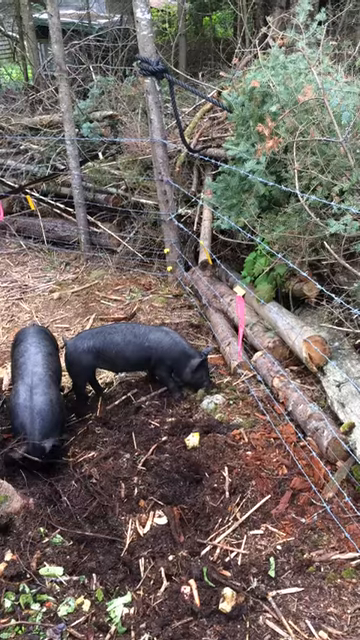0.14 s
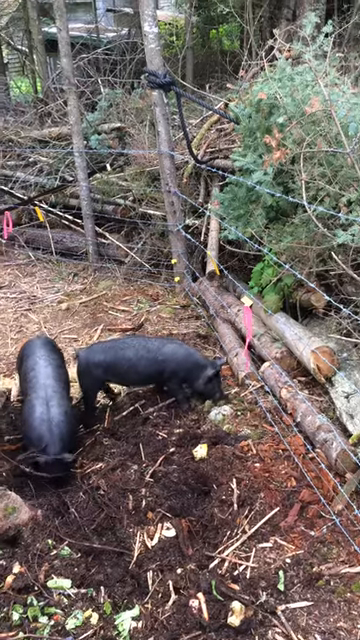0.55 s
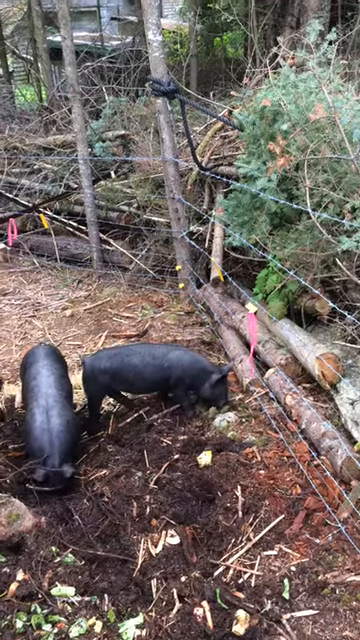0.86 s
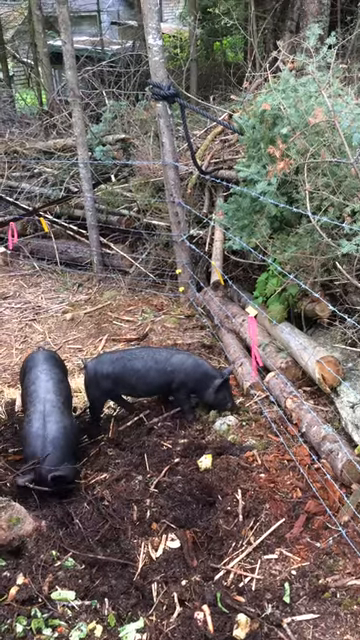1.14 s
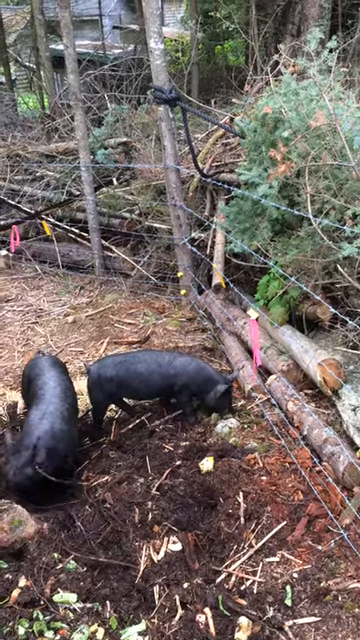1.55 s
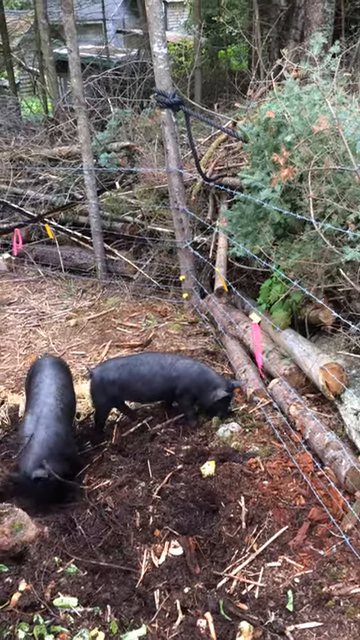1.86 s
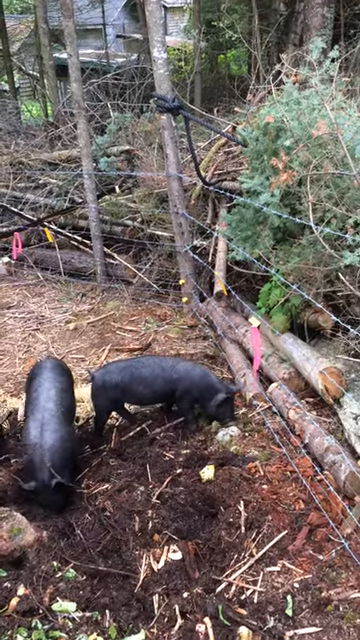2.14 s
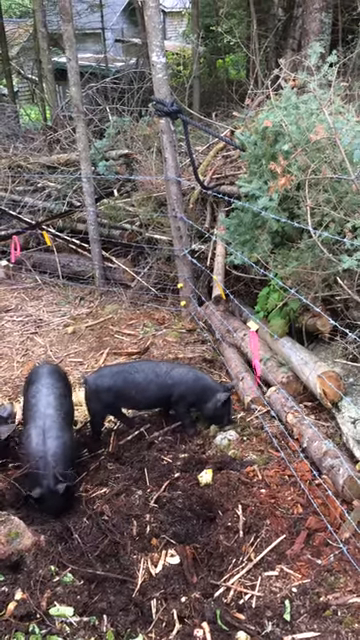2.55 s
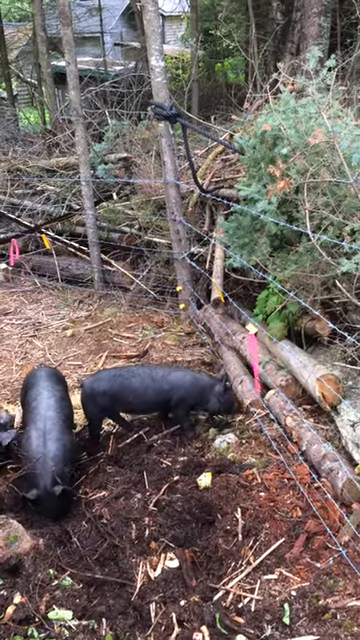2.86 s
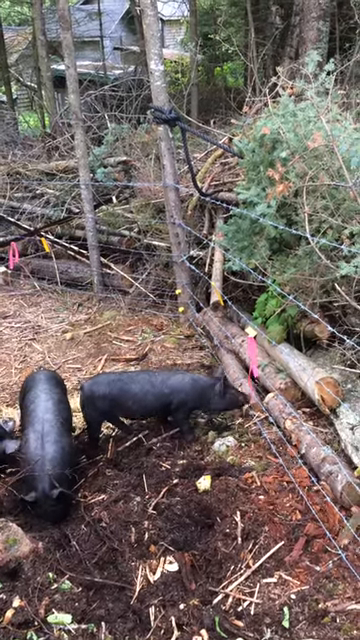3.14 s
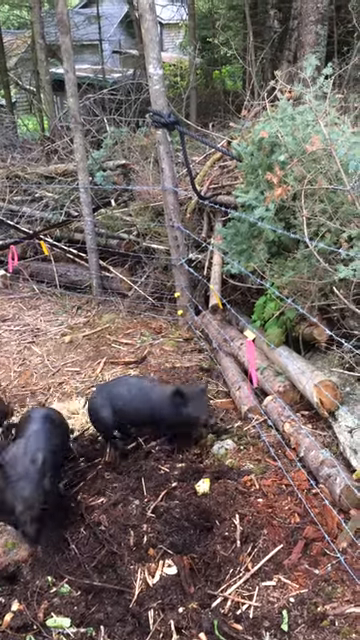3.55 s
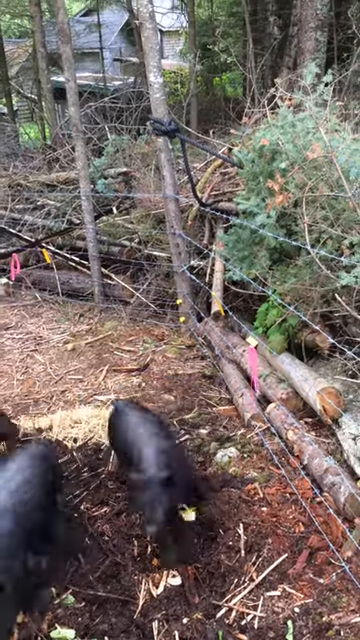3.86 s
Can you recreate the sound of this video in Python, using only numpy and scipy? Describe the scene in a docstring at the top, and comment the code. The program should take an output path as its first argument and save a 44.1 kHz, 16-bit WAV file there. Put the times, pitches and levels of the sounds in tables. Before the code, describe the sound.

A pig's single harsh squeal, high, rough and breathy, bursts out at about 3.4 seconds and falls slightly in pitch until 3.7, with a faint answer from the trees. Before it, the outdoor pen is quiet: distant low hum, faint leaf rustle, a very soft short grunt near 2.0 and barely audible ticks. Light hoof thuds and dry twig snaps follow until 4.0. Close phone sound, identical in both channels.

```python
"""Squeal in a wooded pig pen

A phone microphone hears a distant hum and leaf rustle, one soft grunt, twig ticks and hoof thuds.
Then a pig squeals: two oscillators in its throat, a whistle and a slower flutter, combine into a ladder
of rough lines over breathy noise; trees and a far wall answer faintly. Pulses through chest resonances make
the grunt, damped sines with noise bursts the ticks and thuds, and shaped noise the hum and rustle."""
import sys
import numpy as np
from scipy import signal
from scipy.fft import rfft, irfft, next_fast_len
from scipy.io import wavfile
from scipy.ndimage import uniform_filter1d, minimum_filter1d, map_coordinates

SR = 44100
rng = np.random.default_rng(int(sys.argv[2]) if len(sys.argv) > 2 else 0)


def unload_wav(signal):
    """Save mono or channel-first audio to the path in sys.argv[1] as 16-bit WAV at rate SR, clipped to [-1, 1]."""
    wavfile.write(
        sys.argv[1],
        SR,
        np.round(np.clip(np.atleast_2d(signal).T, -1, 1) * 32767).astype(np.int16),
    )


N = 176400  # samples


def amp(db):
    """Level: decibels to an amplitude ratio."""
    return 10 ** (np.asarray(db) / 20)


def unit(x):
    """Normalization: scale to an rms of 1."""
    return x / np.sqrt(np.mean(np.abs(x) ** 2) + 1e-20)


def along(points, hz):
    """Logarithmic frequency scale: interpolate (f/Hz, value) points along it."""
    f, value = np.transpose(points)
    return np.interp(np.log(hz + 1), np.log(f + 1), value)


def curves(rows):
    """Linear interpolation: one value per sample for each column after the time."""
    times, *columns = np.transpose(rows)
    return [np.interp(np.arange(N) / SR, times, column) for column in columns]


def wobble(rate):
    """Random fluctuation: a smooth curve through normal draws, rate knots a second."""
    return map_coordinates(rng.standard_normal(N // 20), [np.arange(N) * rate / SR])


def filtered(x, response):
    """Linear filtering: multiply the spectrum by a response of frequency."""
    m = next_fast_len(N + SR // 2)
    return irfft(rfft(x, m) * response(np.fft.rfftfreq(m, 1 / SR)), m)[..., :N]


def resonance(f, hz, wide_hz):
    """Simple resonance: the response of one damped oscillator, 1 at its peak."""
    return 1j * f * wide_hz / (hz * hz - f * f + 1j * f * wide_hz)


def rush(spectrum, patchy_db):
    """Shaped noise: a spectral envelope over noise with patches of random gain, at rms 1."""
    z = signal.stft(rng.standard_normal(N), nperseg=512)[2]
    field = uniform_filter1d(rng.standard_normal(z.shape), size=6, axis=0)  # smooth in frequency
    field = uniform_filter1d(field, size=8, axis=1)  # smooth in time
    patchy = signal.istft(z * amp(patchy_db * unit(field)), nperseg=512)[1][:N]
    return unit(filtered(patchy, lambda hz: amp(along(spectrum, hz))))


ROUGH, ROUGH_RATE = .3, 200  # share of random shaking (0-1), its knots per second


def rough_line(phase, rough=ROUGH, faster=1):
    """Random modulation: shaking a line's amplitude and phase widens it; rms 1."""
    random_part = wobble(faster * ROUGH_RATE) + 1j * wobble(faster * ROUGH_RATE)
    shake = 1 - rough + rough * random_part
    return unit((shake * np.exp(1j * phase)).real)


# Course of the squeal: t/s, whistle f/Hz, line over it f/Hz, line under it f/Hz, then level/dB of: line under,
# whistle, line over, throat rasp, line over the doubled whistle, treble
SQUEAL_COURSE = [(3.412, 2832, 3308, 1900, -14, -29, -33, -26, -22.5, -25),
                 (3.43, 2839, 3340, 1959, -13, -17.5, -15, -15, -34, -21.5),
                 (3.445, 2720, 3390, 1951, -20, -15, -7, -20, -31.5, -17),
                 (3.47, 2740, 3476, 2040, -26.5, -11.5, -8.5, -24, -21, -21),
                 (3.49, 2722, 3428, 2005, -26.5, -18.5, -10, -31, -32.5, -22),
                 (3.51, 2741, 3437, 2076, -25, -15, -15, -27, -24.5, -25),
                 (3.53, 2730, 3415, 2037, -22.5, -14, -13, -30, -25, -20),
                 (3.552, 2754, 3400, 2100, -35, -18, -18.5, -28, -21.5, -24),
                 (3.566, 2621, 3270, 1968, -29, -22.5, -17.5, -38, -19, -26),
                 (3.59, 2616, 3276, 1996, -33, -26, -23.5, -39.5, -23.5, -25.5),
                 (3.61, 2587, 3214, 1967, -25, -44, -20.5, -41.5, -51, -25),
                 (3.632, 2585, 3160, 1987, -35.5, -34, -18, -43.5, -48, -27.5),
                 (3.655, 2492, 3135, 1792, -31, -33.5, -27.5, -43.5, -61, -26.5),
                 (3.675, 2550, 3085, 1645, -38, -46, -27, -49, -58, -29),
                 (3.695, 2280, 2990, 1660, -46, -33, -42, -46, -64, -34.5)]
# Weaker combination lines: multiple of whistle, multiple of flutter, level/dB relative to the treble
COMBINATION_LINES = [(2, -1, -16), (2, 0, -13), (2, 2, -18), (2, 3, -11), (3, 0, -10), (3, 1, -9),
                     (3, 2, -9), (3, 3, -9), (3, 4, -8), (4, 0, -9), (4, 1, -11), (4, 2, -16), (1, 2, -14)]
# Lines at half-flutter steps from the whistle: offset in flutters (rounded to the nearest half, so one falls on
# the whistle itself), level/dB relative to the strong lines
SIDE_LINES = [(1.5, -14.5), (0.25, -19), (-0.75, -28.5)]
# Plain lower note on which the voice first catches: multiple of its fundamental, level/dB
CATCH_NOTE = [(1, -44), (3, -9.5), (4, -15.5), (5, -20), (8, -20)]
# Spectrum of the breath noise: f/Hz, relative level/dB
BREATH_SPECTRUM = [(290, -71.5), (500, -51.5), (1030, -20.5), (1590, -13.5), (2000, 7), (2450, -22.5),
                   (2680, -7), (2880, -7.5), (3370, 5), (4250, -10.5), (5930, -11.5), (7050, -4.5),
                   (10900, -9.5), (15200, -20.5), (15800, -33)]
# Hollows of the mouth: f/Hz, width/Hz, depth (0-1)
MOUTH_HOLLOWS = [(4186, 170, .95), (6980, 270, 0.3), (12900, 500, .95)]
ATTACK_S, RELEASE_S = .0079, .012  # before the first row and after the last
DRIFT_RAD, DRIFT_RATE = .35, 90  # phase drift, its knots per second
LADDER_ROUGH, FADE_DB, FADE_RATE = .65, 5, 30  # shaking share; each line's fading, its knots per second
CATCH_HZ, CATCH_T60_S = 603.3, .091
FLUTTER_DB = -29.5  # the bare flutter, relative to the treble
RASP_HZ, RASP_SAG_HZ_PER_S2, RASP_ROUGH = 1099, 3000, .6
SIDE_LINES_END_S, SIDE_LINES_FADE_S = 3.56, .016
BREATH_LOW_DB, BREATH_HIGH_DB, SPLIT_HZ = -6, -1, 3600  # relative to strong lines; to treble; band edge


def squeal():
    """Nonlinear coupling: whistle and flutter form sum and difference lines, with rasp and breath."""
    (whistle, over, under, under_db, whistle_db, over_db,
     rasp_db, double_db, treble_db) = curves(SQUEAL_COURSE)
    start, end = SQUEAL_COURSE[0][0], SQUEAL_COURSE[-1][0]
    t = np.arange(N) / SR - start
    attack = np.clip(t / ATTACK_S + 1, 0, 1) ** 2
    release = np.clip((end - start - t) / RELEASE_S + 1, 0, 1) ** 2

    # Phase is the integral of frequency, plus a drift
    fast, slow, below = [2 * np.pi * np.cumsum(hz) / SR + DRIFT_RAD * wobble(DRIFT_RATE)
                         for hz in (whistle, over - whistle, under)]

    voice = amp(under_db) * rough_line(below)
    voice += amp(whistle_db) * rough_line(fast)
    voice += amp(over_db) * rough_line(fast + slow)
    voice += amp(double_db) * rough_line(2 * fast + slow)
    for m, k, db in COMBINATION_LINES:
        level = amp(treble_db + db + FADE_DB * wobble(FADE_RATE))
        voice += level * rough_line(m * fast + k * slow, LADDER_ROUGH, faster=m / 2)
    voice += amp(treble_db + FLUTTER_DB) * rough_line(slow)

    catch_decay = amp(-60 * np.abs(t) / CATCH_T60_S)
    for k, db in CATCH_NOTE:
        voice += catch_decay * amp(db) * rough_line(2 * np.pi * round(k) * CATCH_HZ * t)

    effort = np.sqrt(amp(under_db) ** 2 + amp(whistle_db) ** 2 + amp(over_db) ** 2)  # the strong lines
    fading = np.clip((SIDE_LINES_END_S - start - t) / SIDE_LINES_FADE_S, 0, 1)
    for k, db in SIDE_LINES:
        voice += effort * fading * amp(db) * rough_line(fast + round(2 * k) / 2 * slow, LADDER_ROUGH)

    rasp_phase = 2 * np.pi * (RASP_HZ * t - RASP_SAG_HZ_PER_S2 * t ** 3 / 3)
    rasp = amp(rasp_db) * rough_line(rasp_phase, RASP_ROUGH)

    breath = rush(BREATH_SPECTRUM, patchy_db=2.5) * (1 + .5 * np.cos(slow))  # the flutter chops it
    low = amp(BREATH_LOW_DB) * effort * unit(filtered(breath, lambda f: f < SPLIT_HZ))
    high = amp(treble_db + BREATH_HIGH_DB) * unit(filtered(breath, lambda f: f >= SPLIT_HZ))

    sound = attack * release * (voice + rasp + low + high)
    return filtered(sound, lambda f: np.prod(
        [1 - depth * resonance(f, hz, wide) for hz, wide, depth in MOUTH_HOLLOWS], axis=0))


# Course of the grunt: t/s, mean pulse rate f/Hz, level/dB
GRUNT_COURSE = [(1.945, 155, -58), (1.96, 144, -49.5), (2.0, 86, -47), (2.035, 74, -43), (2.055, 99, -62)]
# Chest resonances, each applied twice: f/Hz, width/Hz of one pass, relative level/dB
CHEST_RESONANCES = [(167, 130, 4), (340, 140, -17)]


def grunt():
    """Source and filter: uneven throat pulses, slowing for most of the grunt, ring the chest."""
    rate, db = curves(GRUNT_COURSE)
    t = np.arange(N) / SR
    cycles = np.cumsum(rate * (1 + .15 * wobble(74))) / SR
    pulses = np.diff(np.floor(cycles), prepend=0)  # one pulse per whole cycle
    pulses = pulses * amp(2 * wobble(90))

    def chest(f):
        """Parallel resonances: neighbours add with opposite sign."""
        return sum((-1) ** k * amp(gain) * resonance(f, hz, wide) ** 2
                   for k, (hz, wide, gain) in enumerate(CHEST_RESONANCES))
    sounding = (t > GRUNT_COURSE[0][0]) * (t < GRUNT_COURSE[-1][0])
    return unit(filtered(pulses, chest)) * amp(db) * sounding


# Snapping twigs: t/s, initial level/dB, ring f/Hz
TWIG_TICKS = [(2.228, -43, 6200), (2.95, -52, 11000), (3.344, -39, 2960), (3.35, -36, 1000),
              (3.75, -33.5, 2220), (3.8, -50, 2600), (3.87, -39, 1400), (3.872, -43, 10520),
              (3.937, -42.5, 4430), (3.98, -26.5, 6780)]
# Hooves on soil: t/s, initial level/dB, ring f/Hz
HOOF_THUDS = [(1.28, -49, 62), (2.36, -48.5, 160), (3.348, -38.5, 654), (3.394, -36, 397), (3.53, -38, 60),
              (3.655, -45.5, 570), (3.70, -40, 837), (3.745, -42, 226), (3.836, -48.5, 176.7),
              (3.847, -46, 110), (3.93, -44, 108), (3.978, -43.5, 450)]


def knocks(events, t60, ring, noise_hz):
    """Impact: a damped sine (share ring) with low-passed noise, falling 60 dB in t60 seconds."""
    out, t = np.zeros(N + SR), np.arange(SR // 10) / SR
    lowpass = signal.butter(2, noise_hz, fs=SR, output="sos")
    for start, db, hz in events:
        noise = unit(signal.sosfilt(lowpass, rng.standard_normal(len(t))))
        body = ring * np.sin(2 * np.pi * hz * t) + (1 - ring) * noise
        out[round(start * SR):][:len(t)] += amp(db - 60 * t / t60) * body
    return out[:N]


# Reverberation of the trees: f/Hz, t60/s
TREE_DECAY = [(300, 0.32), (1900, .35), (3000, 0.52), (5000, 0.24), (10000, 0.27)]
TREES_DELAY_S = .03


def trees(x):
    """Diffuse reverberation: a noise tail in which each frequency decays at its own rate."""
    hz, t, z = signal.stft(rng.standard_normal(SR * 2 // 3), SR, nperseg=256)
    decay = amp(-60 * t / along(TREE_DECAY, hz)[:, None])
    tail = signal.istft(z * decay, SR, nperseg=256)[1]
    delayed = np.pad(x, (round(TREES_DELAY_S * SR), 0))
    return signal.fftconvolve(delayed, tail / np.linalg.norm(tail))[:N]


FAR_S, FAR_HZ, FAR_WIDE_HZ = .29, 2750, 500  # delay, centre and width of the reflected band


def far_wall(x):
    """Discrete echo: a late, band-limited reflection smeared by a short decaying noise."""
    t = np.arange(SR // 20) / SR
    smear = unit(rng.standard_normal(len(t)) * amp(-60 * t / .089)) / np.sqrt(len(t))
    smeared = signal.fftconvolve(x, smear)[:N]
    # A linear phase is a pure delay
    return filtered(smeared, lambda f: resonance(f, FAR_HZ, FAR_WIDE_HZ) * np.exp(-2j * np.pi * f * FAR_S))


# Course of the background before its offsets: t/s, hum level/dB, rustle level/dB
BACKGROUND_COURSE = [(.12, -61.5, -76), (.35, -62.5, -71.5), (.55, -62.5, -68), (1, -61, -73.5),
                     (1.35, -60, -68.5), (1.5, -63, -68.5), (1.61, -59, -66.5), (1.68, -59.5, -60.5),
                     (1.76, -59.5, -69), (2.05, -61.5, -67.5), (2.2, -59.5, -72), (2.9, -59, -71.5),
                     (3.12, -59, -70.5), (3.33, -60, -71), (3.35, -48.5, -58), (3.375, -54.5, -60),
                     (3.4, -53, -44), (3.7, -59, -51.5), (3.8, -65.5, -65.5), (3.91, -62, -65),
                     (3.94, -57.5, -61), (4, -59.5, -55.5)]
# Spectrum of the hum: f/Hz, relative level/dB
HUM_SPECTRUM = [(15, -37), (25, -8), (172, -2.5), (242, -8), (364, -5), (411, -9), (890, -9), (957, -6),
                (1710, -12.5), (1970, -14), (8000, -32.5), (10400, -81.5), (17600, -120)]
# Spectrum of the leaf rustle: f/Hz, relative level/dB
LEAF_SPECTRUM = [(1470, -29), (2500, -2.5), (5050, -5), (8940, -8.5), (11100, -8.5), (14700, -13),
                 (15800, -10.5)]
HUM_OFFSET_DB, RUSTLE_OFFSET_DB = 2.5, 1
BASS_LUMPS_DB, RUSTLE_WAVER_DB = 3.5, 1  # depths of random level change


def woods():
    """Stationary noise under slow modulation: a far hum with lumpy bass, and rustling leaves."""
    hum_db, rustle_db = curves(BACKGROUND_COURSE)
    hum = rush(HUM_SPECTRUM, patchy_db=1.5)
    bass = filtered(hum, lambda f: 1 / (1 + (f / 250) ** 4))
    hum = hum - bass + bass * amp(BASS_LUMPS_DB * wobble(25))
    rustle_level = amp(rustle_db + RUSTLE_OFFSET_DB + RUSTLE_WAVER_DB * wobble(22))
    return amp(hum_db + HUM_OFFSET_DB) * hum + rustle_level * rush(LEAF_SPECTRUM, patchy_db=0)


def scene():
    """Superposition: sources and reflections add at one microphone, copied to two channels."""
    pig = squeal()
    answers = amp(-27) * trees(pig) + amp(-45) * far_wall(pig)
    ticks = knocks(TWIG_TICKS, t60=.01, ring=.59, noise_hz=12000)
    thuds = knocks(HOOF_THUDS, t60=.09, ring=.59, noise_hz=600)
    mono = pig + answers + grunt() + ticks + thuds + woods()
    return np.array([mono, mono])


CEILING, LOOK_S = .98, .003  # limiter peak amplitude and look-ahead
OPENS_S, OPENING_S = .12, .0016  # silence before the microphone opens, then its fade-in
BASS_CUT_HZ, TOP_HZ = 36, 15800


def record(dry):
    """Transducer limits: a peak limiter, a late opening, a first-order bass cut and a sharp band limit."""
    look = round(LOOK_S * SR)
    need = np.minimum(1, CEILING / (np.abs(dry) + 1e-9))
    limited = dry * uniform_filter1d(minimum_filter1d(need, size=2 * look + 1), size=look)
    opening = np.clip((np.arange(N) / SR - OPENS_S) / OPENING_S, 0, 1)
    return filtered(limited * opening, lambda hz: (hz < TOP_HZ) * (1j * hz / (BASS_CUT_HZ + 1j * hz)))


dry = scene()
out = record(dry)
unload_wav(out)
```